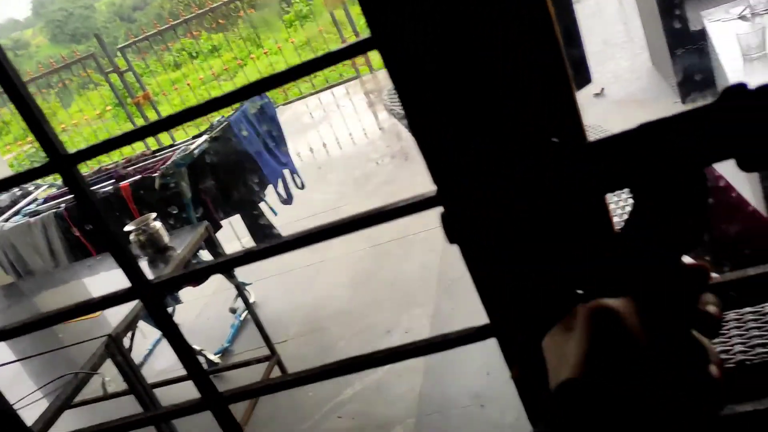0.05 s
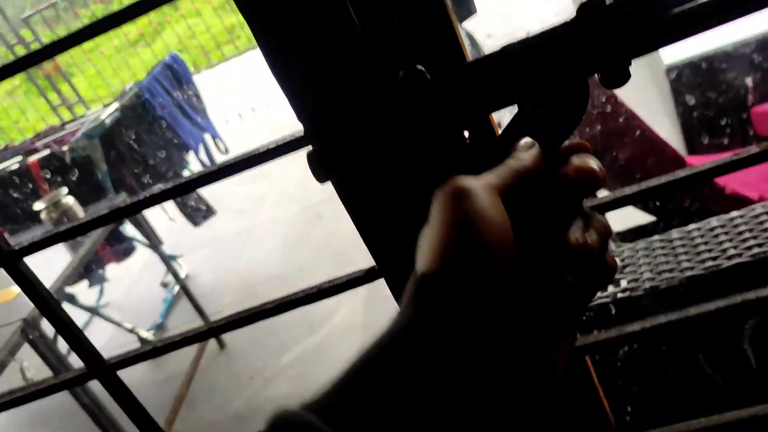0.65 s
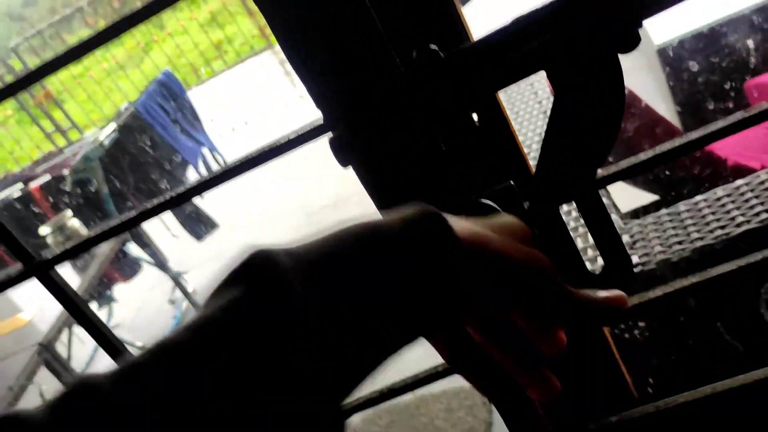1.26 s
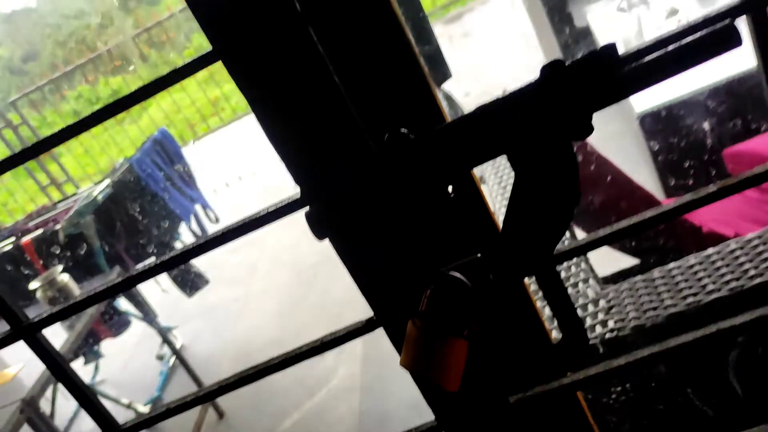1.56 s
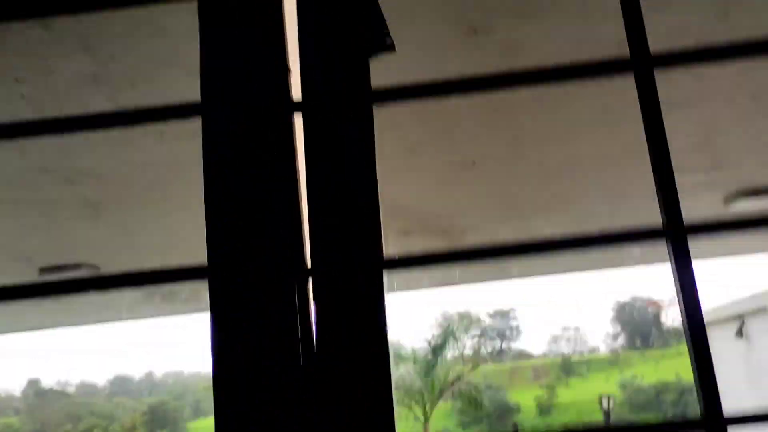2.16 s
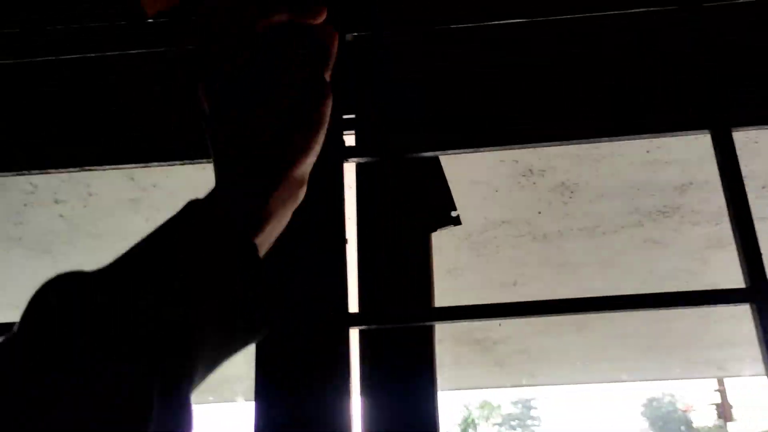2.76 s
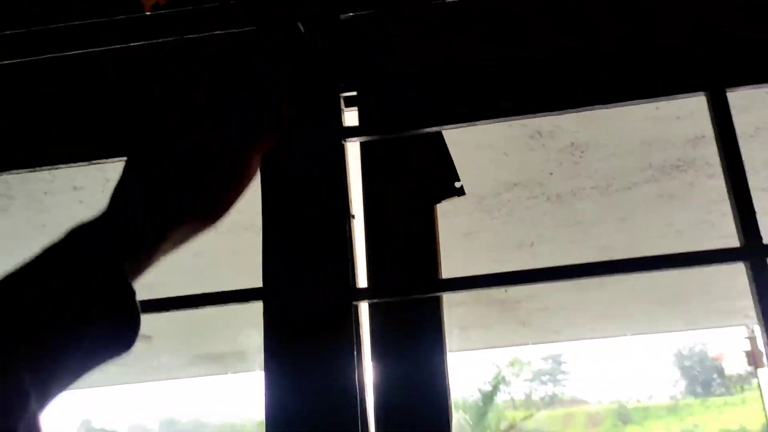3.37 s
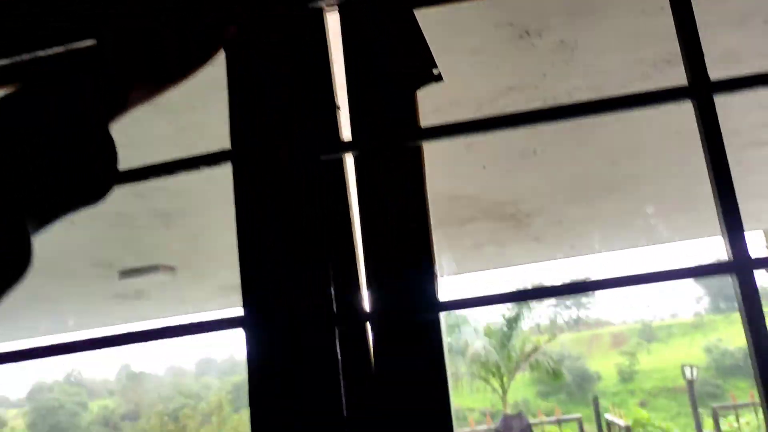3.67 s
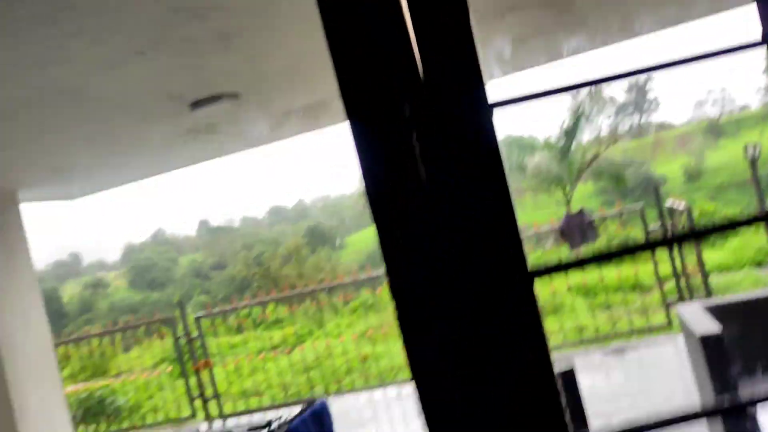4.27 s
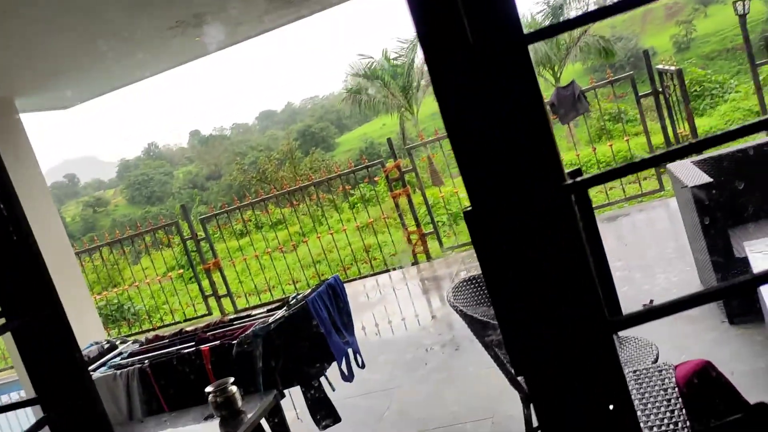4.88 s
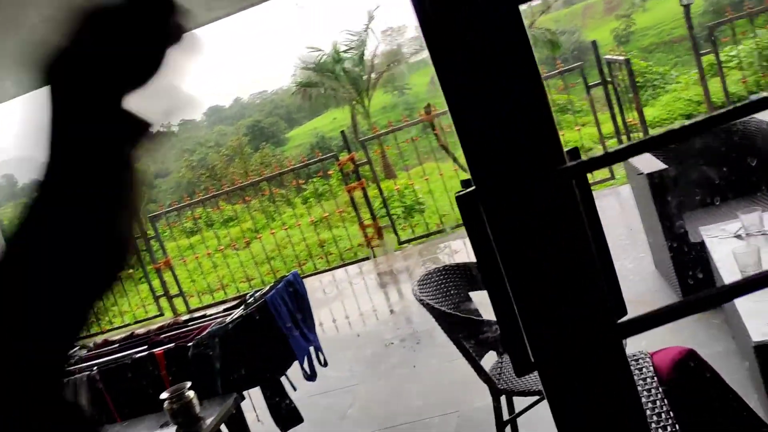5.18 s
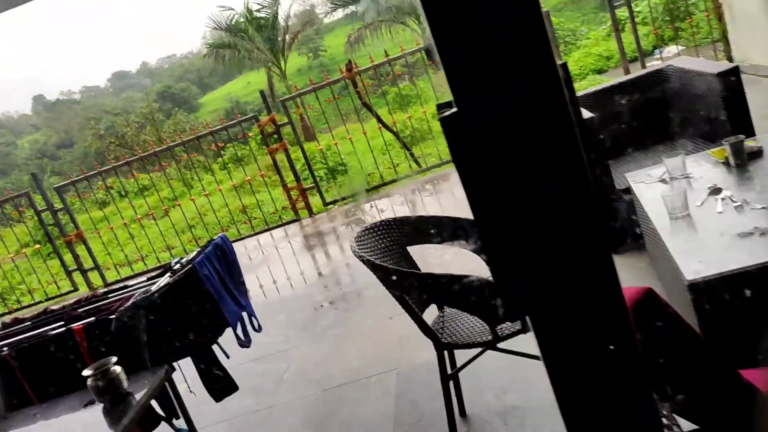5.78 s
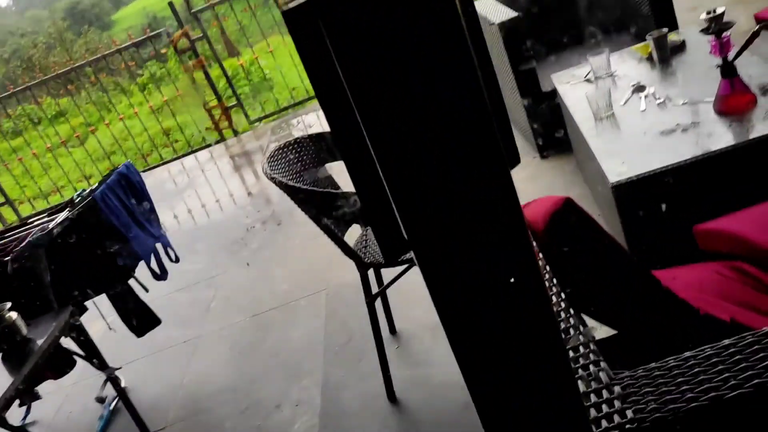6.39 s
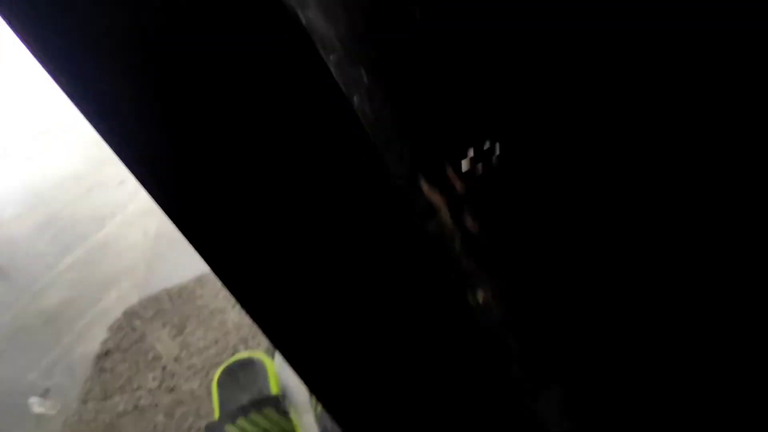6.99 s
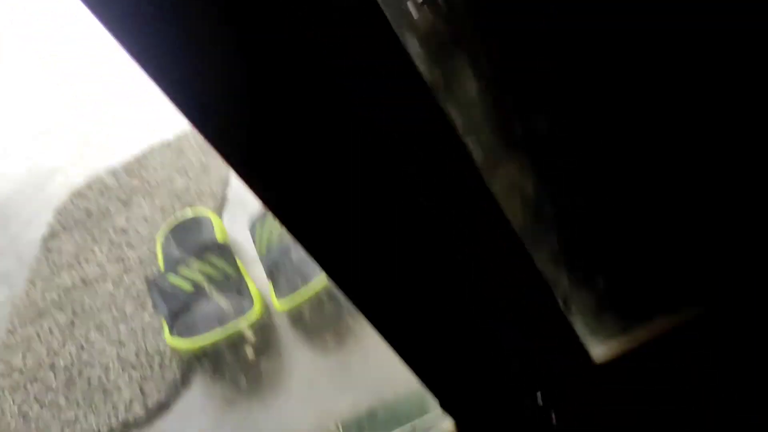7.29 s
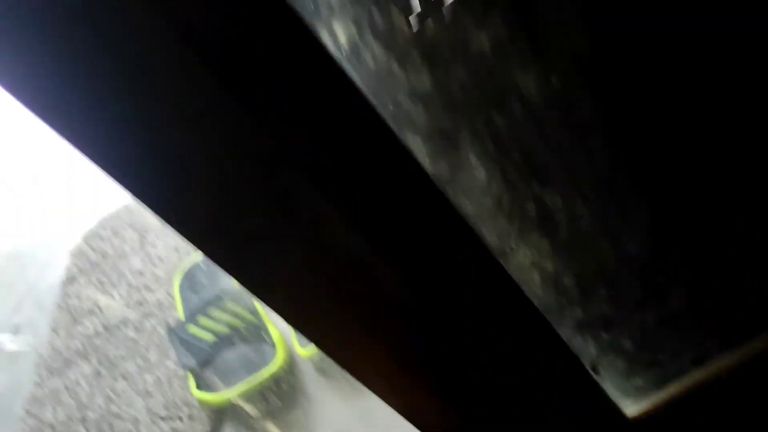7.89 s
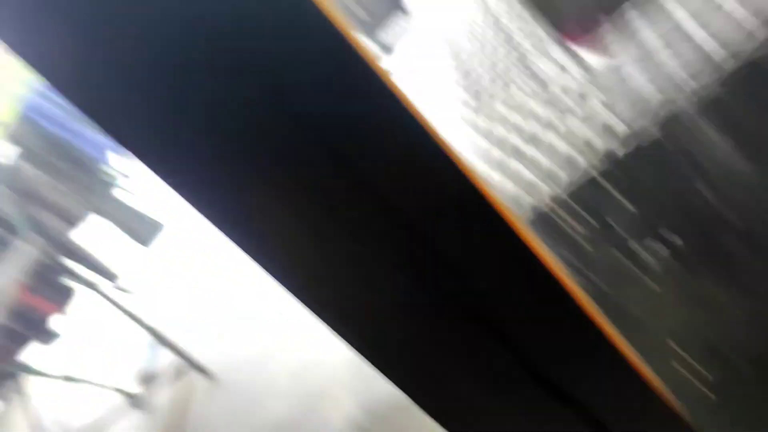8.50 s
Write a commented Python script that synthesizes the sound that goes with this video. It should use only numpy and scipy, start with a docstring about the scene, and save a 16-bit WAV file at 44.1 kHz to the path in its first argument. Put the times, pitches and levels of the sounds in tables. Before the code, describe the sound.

Close up in a hard-walled room, a dry steel door bolt squeals in short twists and ends with a loud clack. The top bolt scrapes and snaps, and the door jolts free with knocks that ring its frame and shake the glass. A hanging padlock ticks over a soft hinge rub, then the bottom bolt clacks brightly. Faint sleeve rustle, low thumps and outdoor rumble lie underneath.

```python
"""Unbolting a steel and glass door

Close up, in a hard-walled room, a dry main bolt sticks and slips, squealing at every twist. The top bolt
scrapes and snaps back, the leaf jolts free, a hanging padlock ticks over the rub of the hinge, and the
bottom bolt clacks. Each blow rings the frame and shakes the panes. Underneath sit a rustling sleeve,
low thumps, outdoor rumble and, near the end, a faint hum."""
import sys
import numpy as np
from scipy import signal
from scipy.io import wavfile

SR = 44100
rng = np.random.default_rng(int(sys.argv[2]) if len(sys.argv) > 2 else 0)


def log_audio(samples):
    """Write samples as a 16-bit WAV file to the path given in sys.argv[1]."""
    # one column per channel
    frames = np.atleast_2d(samples).T
    # limit to full scale, then quantise
    limited = np.clip(frames, -1, 1)
    pcm = np.round(limited * 32767).astype(np.int16)
    wavfile.write(sys.argv[1], SR, pcm)


N = 376613
TIME = np.arange(N) / SR

# Tone colours. Each row: frequency in Hz, relative level in dB.
RUMBLE_EQ = [(15, -8.5), (40, -6.5), (110, -0.5), (180, -8.5), (280, -4), (450, -13), (700, -16),
             (1400, -26.5), (2400, -24.5), (4500, -34), (8000, -36), (14000, -43)]  # open air beyond the door
THUMP_EQ = [(15, -30), (45, 1.5), (110, 0.5), (200, -4.5), (350, -24.5), (800, -50)]  # low thumps
CLOTH_EQ = [(200, 9.5), (1000, -1), (3000, 5), (5000, 2), (7500, 0), (10000, -6), (12000, -7), (14500, -12)]  # sleeve hiss
SCRAPE_EQ = [(100, -24), (400, -7), (750, -5), (1300, -3.5), (2400, -2), (4000, -2), (6500, -8),
             (9000, -19), (14000, -33.5)]  # sliding grit
THUD_EQ = [(30, -29), (85, 0), (130, -0.5), (250, 8), (450, 3), (700, -2.5), (1200, -24), (3000, -56)]  # weight of the leaf
CLANK_EQ = [(200, -23.5), (550, -1.5), (900, 3.5), (1300, 2), (2200, -3.5), (2800, -7.5), (5000, -42.5)]  # midrange of the frame
CLACK_EQ = [(600, -56.5), (1600, -2), (2300, 2.5), (3700, 8.5), (5000, 1.5), (6800, -2.5), (8500, -18.5),
            (11000, -34), (14000, -48)]  # bite of steel on steel
TICK_EQ = [(2000, -26.5), (5500, 4), (7800, 2), (10000, -8), (11500, -12), (14500, -22)]  # top end of a blow
# Ringing modes. Each row: frequency in Hz, relative level in dB, seconds to fall 60 dB.
FRAME_MODES = [(1500, 3, 0.0082), (2003, 4, 0.016), (2260, 4.5, 0.063), (2390, 2.5, 0.066),
               (2693, -6, 0.035), (2974, -13, 0.054), (3647, 0, 0.078), (3700, -9, 0.059),
               (4600, -12, 0.059), (5440, -21, 0.088), (6280, -26, .05)]
PANE_MODES = [(83.47, -3, .8), (115, -12, 0.15), (174.5, -5, 0.58), (215, -3.5, 0.439), (244, 9.5, 0.2),
              (273, -1, 1), (299, -4, 0.58), (369, -15, 0.15), (477, -24.5, .45), (814, -9.5, .4),
              (1170, -8, 0.4)]
# The room's tail. Each row: frequency in Hz, seconds to fall 60 dB.
ROOM_DECAY = [(100, 1.1), (300, 0.67), (1000, 1.2), (2400, 0.88), (4000, 0.63), (7000, 0.58), (13000, 0.14)]
# The fader ride on the outdoor rumble. Each row: time in seconds, level in dB.
RUMBLE_RIDE = [(0, -60), (3.0, -54.5), (4.5, -54), (6.1, -60), (8.54, -58.5)]
# Low hum near the floor. Each row: pitch in Hz, level in dB.
HUM_TONES = [(98, -66.5), (130, -66), (196, -67), (260, -77.5), (300, -69)]
# Low thumps. Each row: start and length in seconds, level in dB, left over right in dB.
LOW_THUMPS = [(2.66, .025, -46, 0), (4.895, 0.045, -50.5, -24), (4.938, 0.099, -44.5, -25),
              (5.62, 0.12, -56, 13), (6.292, 0.077, -61, 16), (6.754, 0.045, -45.5, -12),
              (6.794, 0.22, -55.5, 1.5), (7.484, 0.018, -35, -2)]
# Strokes of cloth and of sliding metal. Each row: start, peak and end in seconds, peak level in dB.
SLEEVE_STROKES = [(2.041, 2.3, 2.58, -54.5), (4.352, 4.6, 4.95, -59.5), (4.7, 5.22, 5.5, -55.5),
                  (6.296, 6.596, 9, -62.5), (6.78, 7.02, 7.25, -50.5)]
SLIDE_STROKES = [(2.319, 2.337, 2.43, -33.5), (2.59, 2.626, 2.756, -32), (2.68, 2.765, 2.984, -39.5),
                 (3.49, 3.491, 3.7, -43), (3.828, 3.93, 4.24, -38), (7.474, 7.485, 7.54, -42.5),
                 (7.602, 7.63, 7.9, -49.5), (7.985, 7.999, 7.915, -56.5), (8.317, 8.324, 8.36, -37.5)]
# The padlock meets the frame. Each row: start in seconds, relative level in dB, ring in Hz.
PADLOCK_TAPS = [(4.5714, -45.5, 2420), (4.7474, -52.5, 2200), (4.8664, -43.5, 2350), (5.011, -42, 2394),
                (5.1549, -38.5, 2350), (5.2806, -42.5, 2380), (5.423, -44.5, 3620), (5.5585, -43, 3410),
                (6.0053, -47, 2430)]
# Loose parts rattle. Each row: start in seconds, pitch in Hz, level in dB, decay time in seconds.
LOOSE_BUZZES = [(3.246, 3600, -41.5, 0.059), (3.604, 3640, -46, 0.13), (8.355, 2640, -42, 0.091)]
# The leaf shudders. Each row: start and length in seconds, level in dB, settling in dB per second.
LEAF_SHAKES = [(0, 0.85, -43, 30), (.68, 0.16, -39, 20.5), (3.506, 0.083, -43.5, 32.5),
               (3.938, 0.048, -43.5, 56), (5.467, .1, -62, 37), (8.327, .2, -54.5, 30)]
# Bolts and leaf hit the frame. Each row: start in seconds, clack drive in dB, ring in Hz,
# thud drive in dB.
FRAME_KNOCKS = [(0.9847, -13, 2186, -29.5), (1.1926, -27.5, 3930, -40.5), (1.3468, -25, 2310, -34),
                (1.4659, -35.5, 2150, -55), (1.8452, -47, 2180, -59.5), (2.4512, -37.5, 2120, -43.5),
                (2.6192, -13.5, 4860, -53), (2.6324, -14, 5200, -56), (2.6598, -8.5, 4220, -42),
                (2.8835, -31, 2510, -38.5), (3.003, -31, 2800, -48.5), (3.1134, -20.5, 2450, -32.5),
                (3.3384, -30.5, 2350, -39), (3.513, -14.5, 4390, -32), (3.6042, -24.5, 3500, -48),
                (3.905, -23.5, 5270, -43), (3.9966, -29, 3630, -42), (4.0609, -25.5, 2930, -39),
                (4.147, -34, 3520, -59), (4.186, -35.5, 3630, -62), (4.299, -44, 3667, -57),
                (4.395, -46.5, 2860, -61), (5.491, -49, 2500, -53)]
# The bottom bolt's blows. Each row: the same four columns, then chatter decay time in seconds.
BOTTOM_CLACKS = [(7.4916, -24.5, 3200, -35.5, 0.0074), (7.6609, -33, 3115, -44.5, 0.019),
                 (7.6777, -29, 4430, -52, 0.0086), (7.693, -33, 3040, -45, 0.0086),
                 (8.2425, -54, 3490, -52, 0.01), (8.3226, -22.5, 5800, -35, 0.026),
                 (8.3533, -29.5, 3600, -42.5, 0.012), (8.5054, -30, 2300, -34.5, 0.017)]
# How strongly the main bolt radiates its harmonics. Each row: frequency in Hz, gain in dB.
SQUEAL_EQ = [(2050, 2), (2700, -4), (4300, -1.5), (5400, -7.5), (6400, -6), (7300, -12.5), (8300, -26.5),
             (9200, -17.5), (10200, -27.5), (11200, -38), (12400, -30.5), (14000, -50.5)]
# One squeal per twist. Each row: start, peak and end in seconds, relative peak level in dB,
# pitch at the peak in Hz, glide in Hz per second, roughness from 0 to 1.
BOLT_TWISTS = [(0, -0.003, 0.031, -6.5, 2413, 303, 0.42), (.024, 0.041, 0.076, -12.5, 2706, 300, 0.37),
               (.088, 0.129, 0.13, -20, 2018, 1210, 0.72), (.175, 0.281, .32, -13.5, 2095, -300, 0.26),
               (0.293, 0.333, 0.39, -16, 2150, -300, 0.53), (.395, 0.454, 0.54, -14.5, 2429, 304, 0.44),
               (.488, 0.506, 0.56, -11.5, 2684, 2000, 0.54), (.553, 0.624, .688, -11, 2170, 1300, .8),
               (.7, .772, .812, -10.5, 2486, 1681, 0.8), (.848, .866, 0.9, -23.5, 2107, 99.5, 0.48)]


def amp(db):
    """Decibels to gain."""
    return 10 ** (np.asarray(db) / 20)


def unit_rms(x):
    """Scales to rms 1."""
    return x / np.sqrt(np.mean(x ** 2) + 1e-20)


def curve_at(points, hz):
    """Reads a curve on a log-frequency axis."""
    freqs, values = np.transpose(points)
    return np.interp(np.log(hz + 1), np.log(freqs + 1), values)


def add(mix, start, sound):
    """Lays a sound into the mix at a start in seconds."""
    part = mix[:, round(start * SR):][:, :sound.shape[1]]
    part += sound[:, :part.shape[1]]


def pan(db):
    """Left and right gains, the left louder by db."""
    return amp([[db / 2], [-db / 2]])


def wander(hz, size=N):
    """Random drift of rms 1, up to about the given rate."""
    place = np.arange(size) * 2 * hz / SR
    return unit_rms(np.interp(place, np.arange(20000), rng.standard_normal(20000)))


def stereo_noise(correlation, size=N):
    """White noise, partly shared by left and right."""
    left, other = rng.standard_normal((2, size))
    return np.array([left, correlation * left + np.sqrt(1 - correlation ** 2) * other])


def swell(start, peak, end, db, fade_db, arch=1, edge_s=0.0041):
    """Envelope of one stroke: fade_db down at its ends, silent outside."""
    away = np.interp(TIME, [start, peak, end], [1, 0, 1])
    gate = np.clip(np.minimum(TIME - start, end - TIME) / edge_s, 0, 1)
    return gate * amp(db - fade_db * away ** arch)


def convolve(x, response):
    """Passes sound through an impulse response."""
    return signal.oaconvolve(np.atleast_2d(x), np.atleast_2d(response), axes=1)[:, :np.shape(x)[-1]]


def colour(x, eq, size=4096):
    """Minimum-phase EQ of unit energy."""
    log_gain = np.log(amp(curve_at(eq, abs(np.fft.fftfreq(size, 1 / SR)))))
    spectrum = np.exp(np.conj(signal.hilbert(log_gain)))
    taps = np.fft.ifft(spectrum).real[:size // 2]
    return convolve(x, taps / np.linalg.norm(taps))


def resonate(x, hz, width_hz):
    """One steep-sided resonance that keeps the power of white noise."""
    t = TIME[:SR // 20]
    response = t * np.exp(-np.pi * width_hz * t) * np.sin(2 * np.pi * hz * t)
    return convolve(x, response / np.linalg.norm(response))


def ring(x, modes):
    """Rings a set of decaying modes, the low ones narrower in stereo."""
    t = TIME[:SR]
    phases = rng.uniform(0, 2 * np.pi, (len(modes), 2, 1))
    response = sum(amp(db - 60 * t / t60) * np.sin(2 * np.pi * hz * t + phase * min(hz / 2000, 1))
                   for (hz, db, t60), phase in zip(modes, phases))
    return convolve(x, response / np.linalg.norm(response[0]))


def room(x, early_db, tail_db, early_s=0.013, mono_hz=430):
    """Reverb return: quick reflections off the door, then a diffuse tail with mono bass."""
    hz, t, bands = signal.stft(rng.standard_normal((2, int(SR * 1.25))), SR, nperseg=256)
    shared = 1 / (1 + (hz[:, None] / mono_hz) ** 4)
    bands[1] = shared * bands[0] + np.sqrt(1 - shared ** 2) * bands[1]
    decay = amp(-60 * t / curve_at(ROOM_DECAY, hz)[:, None])
    tail = signal.istft(bands * decay, SR, nperseg=256)[1]
    t = np.arange(tail.shape[1]) / SR
    tail *= np.clip(t / 0.016, 0, 1)
    echoes = rng.standard_normal(tail.shape) * (rng.random(tail.shape) < .03)
    early = echoes * np.exp(-t / early_s) * (t > .002)
    response = amp(tail_db) * unit_rms(tail) + amp(early_db) * unit_rms(early)
    return convolve(x, response / np.sqrt(len(t)))


def outdoor_rumble(drift_db=2):
    """A quiet, slowly shifting bed of open air from beyond the door."""
    ride_db = np.interp(TIME, *np.transpose(RUMBLE_RIDE))
    return colour(stereo_noise(0.22), RUMBLE_EQ) * amp(ride_db - drift_db * wander(0.91))


def floor_hum(start_s=6.89, rise_s=0.29, waver=0.0158):
    """Faint low tones fade in and waver together."""
    clock = np.cumsum(1 + waver * wander(5.2)) / SR
    fade_in = np.clip((TIME - start_s) / rise_s, 0, 1)
    return fade_in * sum(amp(db) * np.sqrt(2) * np.sin(2 * np.pi * hz * clock) for hz, db in HUM_TONES)


def low_thumps():
    """Air on the microphone, and the deep thud under two bolt blows."""
    thumps = np.zeros((2, N))
    for start, length, db, pan_db in LOW_THUMPS:
        size = int(length * SR)
        arch = np.sin(np.linspace(0, np.pi, size))
        add(thumps, start, amp(db) * pan(pan_db) * arch * stereo_noise(0.28, size))
    return colour(thumps, THUMP_EQ)


def sleeve(grain_db=2):
    """Cloth brushes past with a soft, grainy hiss."""
    strokes = sum(swell(*row, fade_db=17, arch=1.29, edge_s=0.034) for row in SLEEVE_STROKES)
    grains = unit_rms(stereo_noise(0.049) * amp(grain_db * wander(120)))
    return colour(grains * strokes, CLOTH_EQ)


def hinge_rub(grain_db=2.5):
    """The hinge's grainy friction starts at once and fades as the leaf swings."""
    swing = swell(start=4, peak=4, end=5.5, db=-58.5, fade_db=16, arch=1.7)
    return swing * amp(grain_db * wander(70)) * stereo_noise(0.65)


def padlock_and_hinge(tap_s=0.0039, tap_gain_db=3):
    """The swinging padlock clinks and the hinge groans; both ring the frame."""
    t = TIME[:4000]
    taps, clinks = np.zeros((2, 2, N))
    for start, db, hz in PADLOCK_TAPS:
        tap = amp(db + tap_gain_db) * np.exp(-t / tap_s) * stereo_noise(0.62, len(t))
        add(taps, start, tap)
        add(clinks, start, amp(-2) * resonate(tap, hz, width_hz=650))
    rub = hinge_rub()
    groan = amp(-2) * resonate(rub, hz=2550, width_hz=700)
    left, right = colour(taps, CLACK_EQ) + clinks + groan + amp(-4) * ring(taps + rub, FRAME_MODES)
    return np.array([np.roll(left, 16), right])  # a late left side places them to the right


def loose_parts():
    """Each loose part buzzes in one narrow resonance until it settles."""
    t, out = TIME[:SR // 2], np.zeros((2, N))
    for start, hz, db, decay_s in LOOSE_BUZZES:
        rattle = np.exp(-t / decay_s) * stereo_noise(0.26, len(t))
        add(out, start, amp(db) * resonate(rattle, hz, width_hz=330))
    return out


def leaf_judder(rise_s=0.051, lumps_db=2):
    """The leaf shudders as it is worked, struck or swung, then settles."""
    shakes = [np.clip((TIME - start) / rise_s, 0, 1)
              * amp(db - settling * np.maximum(TIME - start - length, 0))
              for start, length, db, settling in LEAF_SHAKES]
    return np.max(shakes, axis=0) * unit_rms(amp(lumps_db * wander(22))) * stereo_noise(0.88)


def leaf_recoil(rise_s=0.0069, decay_s=0.032):
    """The heavy leaf answers every blow more slowly than the steel."""
    t, out = TIME[:SR // 4], np.zeros((2, N))
    envelope = np.exp(-t / decay_s) * (1 - np.exp(-t / rise_s))
    for start, _, _, thud_db, *_ in FRAME_KNOCKS + BOTTOM_CLACKS:
        add(out, start, amp(thud_db) * envelope * stereo_noise(0.92, len(t)))
    return out


def scrapes(grain_db=3):
    """Gritty friction swells and dies as a bolt or the leaf's edge slides."""
    strokes = sum(swell(*row, fade_db=22) for row in SLIDE_STROKES)
    grains = unit_rms(stereo_noise(0.29) * amp(grain_db * wander(300)))
    return colour(grains * strokes, SCRAPE_EQ)


def strike(clack_db, ring_hz, thud_db, tick_db, chatter_s, rise_s, crack_s=0.0036):
    """Steel on steel: a crack and a dying chatter ring the struck part and clank the frame."""
    t = TIME[:SR // 4]
    contact = (np.exp(-t / chatter_s) + amp(2) * np.exp(-t / crack_s)) * (1 - np.exp(-t / rise_s))
    layers = [(clack_db - 9, CLACK_EQ), (thud_db - 2, CLANK_EQ), (tick_db, TICK_EQ)]
    blow = sum(amp(db) * colour(contact * stereo_noise(0.06, len(t)), eq, size=512) for db, eq in layers)
    ringing = resonate(contact * stereo_noise(0.27, len(t)), ring_hz, width_hz=480)
    return blow + amp(clack_db - 14) * ringing


def frame_knocks(tick_growth=1.82):
    """Bolts and leaf knock against the frame: the harder, the brighter."""
    out = np.zeros((2, N))
    for start, clack_db, ring_hz, thud_db in FRAME_KNOCKS:
        tick_db = -40 + tick_growth * (clack_db + 19)
        add(out, start, strike(clack_db, ring_hz, thud_db, tick_db, chatter_s=0.0093, rise_s=0.00088))
    return out


def bottom_bolt():
    """The bottom bolt strikes close by, so its clacks are bright."""
    out = np.zeros((2, N))
    for start, clack_db, ring_hz, thud_db, chatter_s in BOTTOM_CLACKS:
        tick_db = clack_db - 10.5
        add(out, start, strike(clack_db, ring_hz, thud_db, tick_db, chatter_s, rise_s=0.00074))
    return out


def bolt_squeal(bend=.025, wobble=.006, jitter=.046, shimmer_db=1.5, flutter_db=2.42):
    """Stick-slip of the dry main bolt: a gliding harmonic stack whose period stumbles with roughness."""
    size = 2 * SR
    grips = np.array([swell(*row[:4], fade_db=13, arch=1.6)[:size] for row in BOLT_TWISTS])
    # the loudest twist at each moment sets pitch and roughness
    _, peak_s, _, peak_db, pitch, glide, rough = np.array(BOLT_TWISTS)[grips.argmax(axis=0)].T
    grip = grips.max(axis=0)
    slack = 1 - grip / amp(peak_db)  # the pitch sags under the hardest grip
    hz = pitch + glide * (TIME[:size] - peak_s)
    hz *= 1 + bend * slack ** 2 + wobble * wander(28, size)
    cycles = np.cumsum(hz * (1 + jitter * rough * wander(520, size))) / SR
    tone = np.zeros((2, size))
    for k in range(1, 7):
        level = amp(curve_at(SQUEAL_EQ, k * hz) + shimmer_db * wander(140, size))
        tone += level * np.sin(2 * np.pi * k * cycles) * pan(-2 if k <= 2 else 2)
    # the bolt radiates little below its lowest resonance
    tone = signal.sosfilt(signal.butter(6, 1800, "highpass", fs=SR, output="sos"), tone)
    tone[0] = np.roll(tone[0], 1)  # reaches the left a moment later
    grains = stereo_noise(.6, size) * amp(2 * wander(440, size)) * np.sqrt(rough) * pan(-2)
    rasp = amp(-13) * colour(grains, CLACK_EQ) + amp(-24) * colour(grains, SCRAPE_EQ)
    bolt = amp(-4 + flutter_db * wander(170, size)) * grip * (tone + rasp)
    return bolt + room(bolt, early_db=0, tail_db=-3.5)


def scene():
    """Bolts, frame and panes play into the room; sleeve, thumps, hum and rumble stay dry."""
    knocks, clacks = frame_knocks(), bottom_bolt()
    judder, swing = leaf_judder(), padlock_and_hinge()
    blow_send = amp(0.5) * knocks + amp(-10.5) * clacks  # the close bottom bolt stays drier
    grit = scrapes() + amp(-9) * colour(judder * pan(-3.1), CLANK_EQ)
    frame = knocks + clacks + grit + swing + loose_parts() + amp(-15) * ring(blow_send, FRAME_MODES)
    frame += room(blow_send + grit + amp(2) * swing, early_db=-3.5, tail_db=-7)
    shaking = leaf_recoil() + judder
    leaf = colour(shaking, THUD_EQ) + amp(-6) * ring(shaking, PANE_MODES)
    leaf += room(leaf, early_db=-28.5, tail_db=-9)
    mix = (frame + leaf) * pan(-0.5) + sleeve() + low_thumps() + floor_hum() + outdoor_rumble()
    add(mix, 0, bolt_squeal())
    return mix


def record(dry, ceiling=.85, cutoff_hz=14150):
    """A soft clip rounds the tallest peaks, then a steep low-pass trims the top."""
    soft = dry / (1 + (dry / ceiling) ** 6) ** (1 / 6)
    lowpass = signal.firwin(511, cutoff_hz, window=("kaiser", 9), fs=SR)
    return signal.oaconvolve(soft, lowpass[None], "same")


dry = scene()
out = record(dry)
log_audio(out)
```